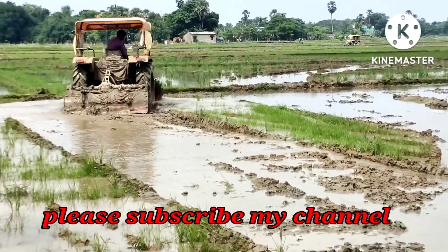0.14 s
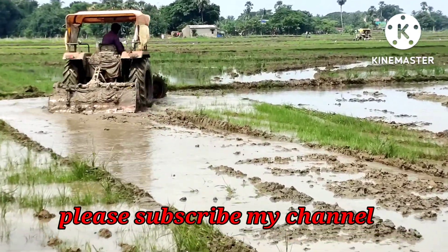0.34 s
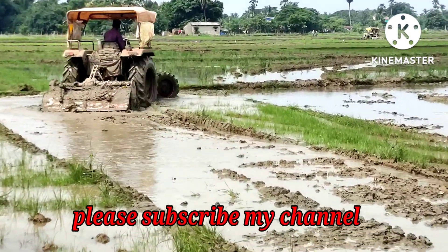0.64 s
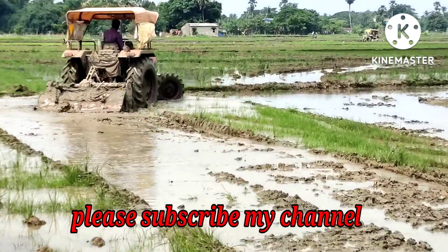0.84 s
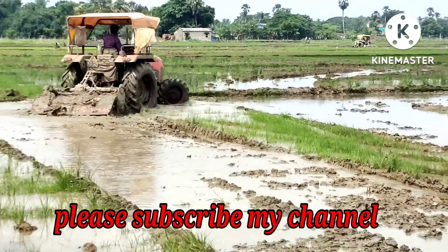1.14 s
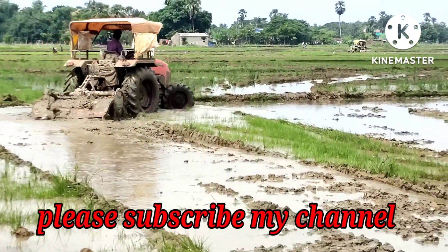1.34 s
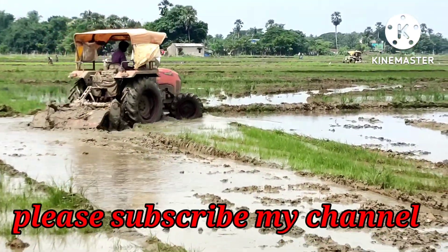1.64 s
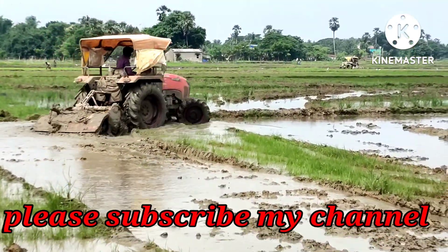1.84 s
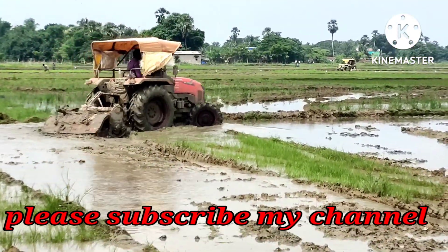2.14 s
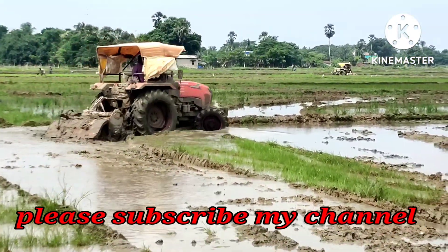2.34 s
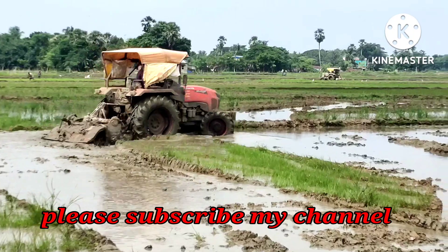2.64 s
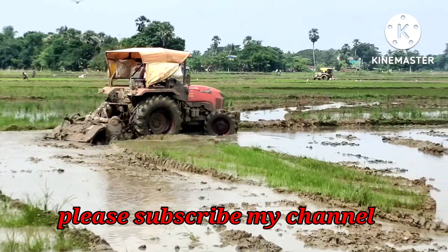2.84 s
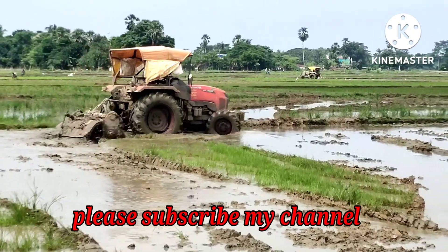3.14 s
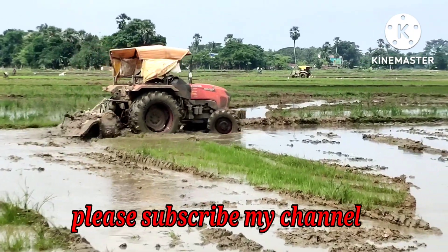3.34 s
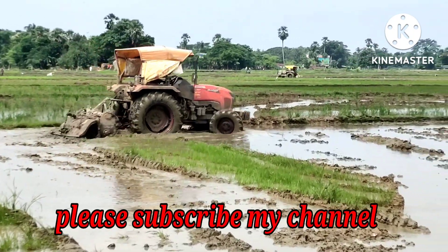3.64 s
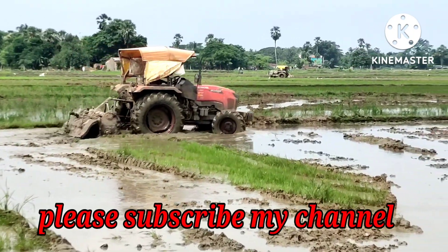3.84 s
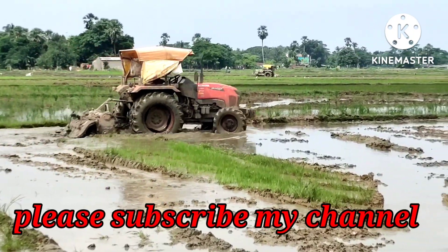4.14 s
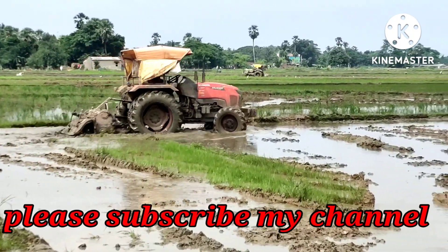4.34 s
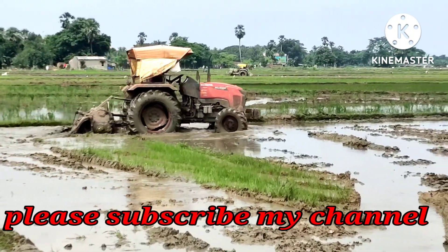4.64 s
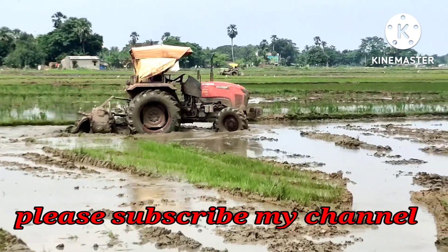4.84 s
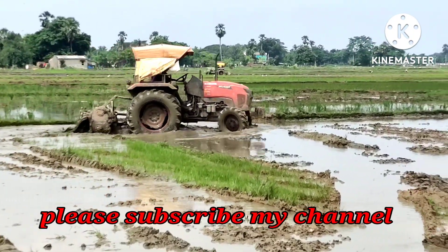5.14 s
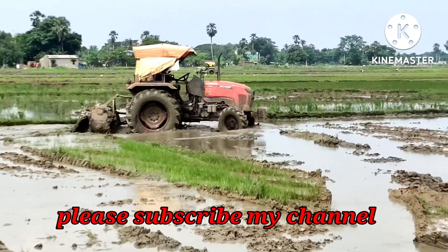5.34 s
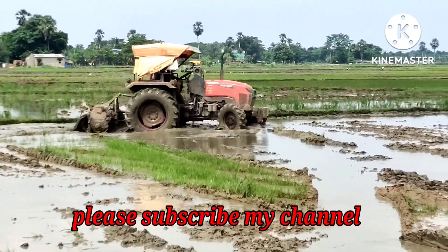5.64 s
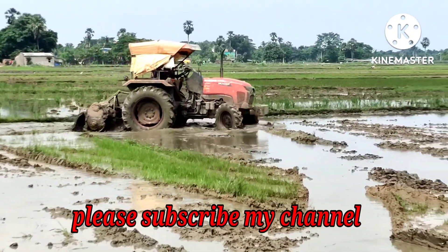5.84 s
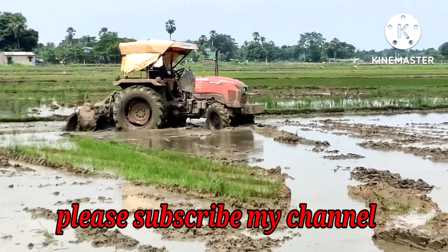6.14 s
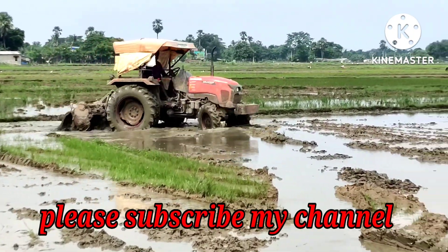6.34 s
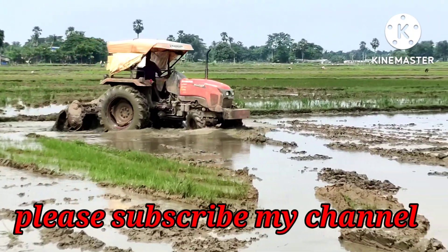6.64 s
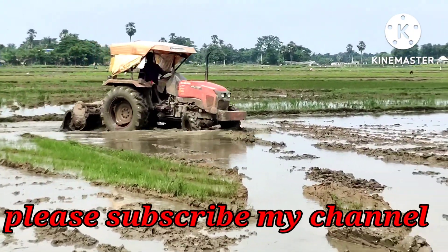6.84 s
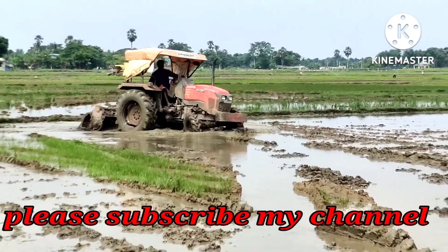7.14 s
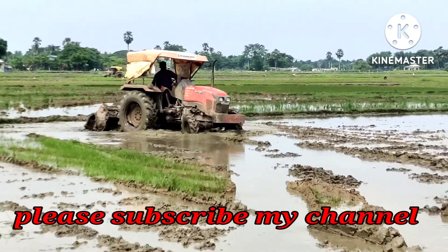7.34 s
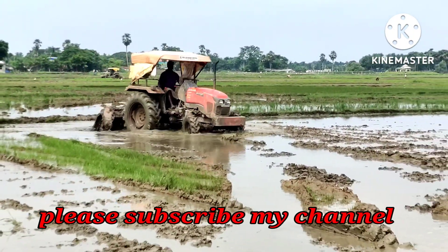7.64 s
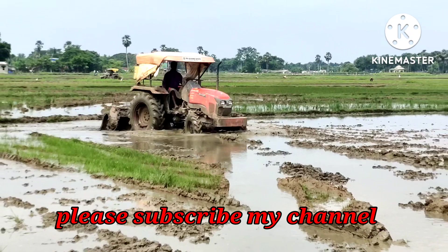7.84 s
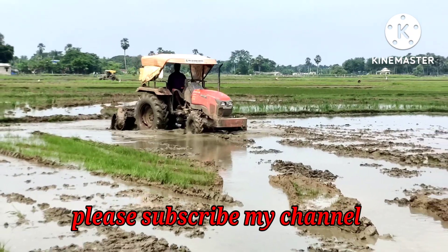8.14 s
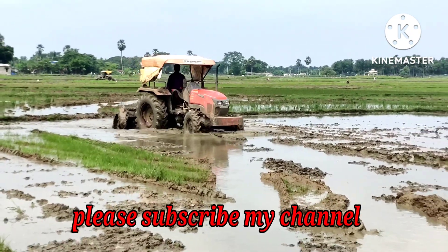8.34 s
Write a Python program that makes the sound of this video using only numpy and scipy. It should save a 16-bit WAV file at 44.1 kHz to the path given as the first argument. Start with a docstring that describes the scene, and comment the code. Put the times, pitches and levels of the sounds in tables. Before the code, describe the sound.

A diesel tractor works a flooded open field, with no echo. Its low exhaust drone, near 60 Hz, runs throughout, sagging around 2 and 3 seconds, under a pulsing metallic sizzle near 4.6 kHz. A loose panel rattles at the start; steel clinks cluster at 1-1.8 seconds as strain makes the sizzle crackle until about 3. The tiller throws wet, gurgling surges, with a heavy mud thump at 2.9. From 3.6 the churning turns narrower and hollow, around 700 Hz, in repeated bursts. Dry joints chirp at 4.5 and 5-5.7. Clods thump strongly from 5.1 to 7, with fine mist around 4 and 5.7-6.9 and a sharp spurt at 6.8. Water washes back at 6.2-6.9, 7.1 and 7.5-8, as the panel rattles and lower clinks ring. A last thump falls at 8.3 while the engine rises slightly, over faint hiss and hum.

```python
"""A flooded field, where a diesel tractor turns, dragging a rotary tiller through water and mud.
Engine: phase-locked exhaust harmonics drone and sag; filtered noise sizzles and rattles in step with
the crank; steel clinks as short rings and dry joints squeak as arching tones.
Tiller and water: resonant noise and bubble packets churn, and mud thumps under the hood. Water splashes
as shaped noise and bubbles, spray tinkles among thin, fitful high tones, and a faint hum lies behind."""
import sys
import numpy as np
from scipy import signal
from scipy.fft import rfft, irfft, next_fast_len
from scipy.io import wavfile
from scipy.ndimage import uniform_filter1d, map_coordinates

SR = 44100
rng = np.random.default_rng(int(sys.argv[2]) if len(sys.argv) > 2 else 0)


def generate_wav(sig):
    """Save sig (samples, or channels by samples) to the path in sys.argv[1] as 16-bit PCM at SR."""
    pcm = np.round(np.clip(np.atleast_2d(sig).T, -1, 1) * 32767).astype(np.int16)
    wavfile.write(sys.argv[1], SR, pcm)


N = 375291

# Engine speed as the exhaust tone, twice the crank rate: time_s, tone_hz
EXHAUST_TONE = [(0, 62.3), (.45, 62.4), (1.0, 61), (1.25, 59.8), (1.6, 60.1), (1.98, 55.1), (2.3, 59.8),
                (2.5, 61.2), (2.8, 60), (3.12, 56.2), (3.55, 61.1), (3.8, 60.3), (4.2, 62), (4.55, 59.3),
                (4.85, 61.2), (6.3, 61.7), (7.25, 62.9), (7.55, 60.3), (8.45, 64.3)]
# Level of the exhaust harmonics as a group: time_s, level_db
EXHAUST_LEVEL = [(0.0, -58), (3.63, -56), (5.81, -61), (8.13, -57), (8.51, -60.5)]
# Exhaust harmonics: multiple_of_exhaust_tone, relative_level_db
EXHAUST_ORDERS = [(1, -6), (2, 1), (3, -11), (4, -9), (5, -14.5), (6, -18.5)]
# Spectrum of the exhaust roar: frequency_hz, relative_density_db_per_hz
ROAR_SPECTRUM = [(15, -34), (42, -0.5), (90, -2), (150, 1), (230, 4.5), (430, -4.5), (700, -18.5),
                 (1200, -3.5), (1450, -16.5), (3200, -17), (3700, -24), (6000, -52)]

# Base level of the engine's sizzle, before its flutter: time_s, level_db
SIZZLE_LEVEL = [(0, -56.5), (2.1, -56), (3.55, -51.5), (4.6, -54.5), (7.55, -54), (8.5, -56.5)]
# Spectrum of the sizzle before its shift: frequency_hz, relative_density_db_per_hz
SIZZLE_SPECTRUM = [(3900, -16), (4250, -17), (4420, 5.5), (4600, 14.5), (4830, 8.5), (4980, 7), (5120, -31),
                   (5500, -35)]
# Slow shift of the sizzle in frequency, before its waver: time_s, shift_hz
SIZZLE_SHIFT = [(0, 10.5), (1.8, 90), (2.3, -29.5), (2.9, 68.5), (4.3, -39), (8.5, -64)]
# The blades bite and the engine strains, adding sizzle: start_s, length_s, level_db
STRAINS = [(1.004, 0.33, -52), (1.559, 0.023, -49.5), (1.684, 0.17, -50.5), (2.363, 0.21, -54.5),
           (2.68, 0.23, -48.5), (2.943, 0.1, -48)]
STRAIN_ATTACK_S, STRAIN_RELEASE_DB_PER_S = 0.016, 79
# Weaker, fitful rings of the sizzling metal: pitch_hz, level_re_sizzle_db, change_at_full_strain_db
SIDE_RINGS = [(3660, -28, 1.5), (4317, -22.5, 7.5), (5205, -21, -1.5), (5674, -21.5, -12)]

# Bouts of a loose panel's rattle: start_s, length_s, level_db, pitch_hz, release_db_per_s
RATTLES = [(0, 0.07, -50, 2804, 40), (0.387, 0.048, -56, 2800, 75), (0.633, 0.017, -57.5, 2780, 122),
           (1.108, 0.2, -61, 2774, 122), (1.643, 0.17, -62.5, 2780, 73), (2.308, 0.038, -56, 2696, 152),
           (2.936, 0.12, -53, 2740, 194), (6.33, 0.25, -56, 2730, 152.5), (6.692, 0.043, -51, 2760, 95),
           (6.935, 0.13, -53, 2690, 159), (7.565, 0.19, -48, 3006, 7), (7.83, 0.22, -53, 2920, 62),
           (8.23, 0.058, -56, 2710, 134)]
RATTLE_ATTACK_S, RATTLE_REST_DB = 0.0089, -75.5
CLATTER_SHARE, CLATTER_WIDTH_HZ = 0.72, 1000  # power share of clatter, before the boom share's weight
# Short contacts of loose steel parts: start_s, peak_db, pitch_hz
CLINKS = [(0.5258, -41.5, 4680), (1.0463, -34, 4830), (1.1125, -39.5, 4700), (1.1786, -38, 4700),
          (1.2524, -38, 4640), (1.264, -37, 4720), (1.353, -44, 4770), (1.5847, -37, 4770),
          (1.795, -38, 4700), (2.7082, -34, 4800), (2.863, -39, 4810), (6.6921, -38, 2745),
          (7.6236, -39, 2680), (7.7704, -38.5, 3040), (7.8505, -34, 2860), (7.884, -34.5, 2840),
          (8.044, -39.5, 2850)]

# Dry joints squeak: start_s, length_s, level_db, top_of_arch_hz (before waver)
SQUEAKS = [(1.992, 0.055, -67, 3260), (2.066, 0.037, -62.5, 2450), (4.522, .055, -51, 3100),
           (4.592, 0.041, -49, 3090), (4.87, 0.15, -63.5, 3050), (4.935, .022, -58, 2530),
           (5.032, .035, -50.5, 3560), (5.088, 0.036, -45, 3035), (5.513, 0.12, -63.5, 3520),
           (5.623, 0.04, -52, 3080), (5.643, 0.038, -54, 2500)]
SQUEAK_ATTACK_S, SQUEAK_RELEASE_DB_PER_S, SQUEAK_RING_DB = 0.0047, 156, -3.5  # after-ring re slip
SQUEAK_FALL_HZ, SQUEAK_WAVER_HZ = 86, 54.9
SQUEAK_CREST = 0.62  # place of the arch's top: 0 start, 2 end

# Share of narrow boom against loose gurgle in the churning: time_s, share_0_to_1
BOOM_SHARE = [(0, 0.74), (1, 0.08), (3.1, 0.25), (3.7, 0.86), (5.2, 0.95), (8.5, 0.94)]
# Churning between surges, before its flutter: time_s, level_db
CHURN_LEVEL = [(0, -67.5), (3.4, -60), (4.2, -54), (5.5, -59), (6.4, -50), (7.6, -50), (8.0, -61),
               (8.5, -59.5)]
# The blades throw up a load of mud: start_s, length_s, mid_level_db, cavity_pitch_hz
SURGES = [(0, 0.22, -57, 650), (0.403, 0.13, -52.5, 626), (0.953, 0.12, -56.5, 751), (1.622, 0.3, -54, 697),
          (2.461, 0.077, -52, 740), (2.68, 0.16, -48, 716), (2.87, 0.19, -49, 659),
          (3.584, 0.12, -46.5, 722), (3.78, 0.029, -45.5, 735), (4.103, 0.057, -45, 747),
          (4.361, 0.16, -46.5, 754), (4.722, 0.24, -51, 721), (5.093, 0.15, -45.5, 720),
          (5.278, 0.23, -48.5, 711), (5.698, 0.1, -45, 719), (6.06, 0.088, -45.5, 677),
          (6.306, 0.15, -51.5, 715), (6.702, 0.062, -44, 727), (6.894, 0.075, -53, 700),
          (7.393, 0.16, -47, 703), (8.275, 0.089, -49.5, 686)]
SURGE_ATTACK_S, SURGE_SAG_DB_PER_S, SURGE_RELEASE_DB_PER_S = 0.016, 6, 254
# Clods of mud thump under the hood: start_s, peak_db, pitch_hz
CLODS = [(0.691, -40.5, 517), (0.817, -45, 900), (.985, -59, 790), (1.275, -50.5, 875), (1.634, -40.5, 688),
         (1.815, -43, 830), (2.112, -49.5, 510), (2.189, -51, 347), (2.685, -41.5, 920), (2.89, -33.5, 636),
         (2.931, -39, 590), (2.982, -46, 610), (3.223, -47, 505), (3.632, -42.5, 680), (3.954, -45, 854),
         (4.102, -46, 800), (4.261, -44, 830), (4.348, -50, 420), (5.107, -36.5, 705), (5.304, -34.5, 747),
         (5.732, -35.5, 730), (5.764, -39, 700), (5.788, -38, 796), (5.941, -40, 687), (6.128, -38, 686),
         (6.33, -49, 430), (6.693, -41, 736), (6.785, -35, 702), (6.924, -32, 706), (7.472, -36.5, 754),
         (8.263, -35, 664)]
KNOCK_HZ, KNOCK_DB = 391.5, -60  # small lumps: centre pitch, and peak before their random size

# The wheels throw up a wash of water: start_s, length_s, level_db
WASHES = [(6.162, 0.74, -57.5), (7.09, 0.36, -57.5), (7.505, 0.45, -54), (8.45, 0.093, -61)]
WASH_ATTACK_S, WASH_RELEASE_DB_PER_S = 0.052, 78
# Water falling back between washes: time_s, level_db
DRIP_LEVEL = [(0, -79), (2.7, -73.5), (4.3, -67.5), (8.5, -65)]
# Spectrum of the falling water: frequency_hz, relative_density_db_per_hz
WATER_SPECTRUM = [(850, -37), (1100, -0.5), (1250, -1.5), (1400, -4.5), (1570, 9), (1750, 9), (2000, -18),
                  (2400, 6.5), (2700, -2), (3100, 5), (3300, -36), (3600, -19), (4000, -25.5)]
# Spectrum of the soft hiss with the water: frequency_hz, relative_density_db_per_hz
AIR_SPECTRUM = [(500, -29), (3000, -6), (6200, -3), (8000, -3.5), (10000, 1), (12000, -1.5), (15500, -1.5)]
# Single splashes, spits and gulps: start_s, bubble_peak_db, centre_pitch_hz, cluster_length_s
SLAPS = [(.02, -65, 12800, .04), (.24, -62, 12600, 0.027), (.68, -51, 471, 0.037), (1.84, -49.5, 520, 0.12),
         (1.89, -55, 1256, .038), (2.07, -52.5, 1110, 0.027), (2.7, -49.5, 930, 0.13),
         (2.8, -57.5, 1574, 0.072), (2.86, -44.5, 555, 0.056), (2.98, -49, 935, .05),
         (3.85, -57, 493, 0.025), (4.12, -55.5, 384, 0.05), (4.71, -55.5, 345, 0.041),
         (4.785, -52.5, 1655, 0.0289), (5.49, -53, 1246, 0.032), (6.08, -53, 363, 0.052),
         (7.16, -49.5, 1745, 0.12), (7.38, -51.5, 1280, 0.11), (7.99, -53, 361, 0.031)]

# Base level of the tinkling drops and high tones: time_s, level_db
SPRAY_LEVEL = [(0, -99), (3.2, -75.5), (3.7, -74), (4.9, -75), (5.9, -67.5), (8.5, -73)]
# Thin, fitful high tones at fixed pitches: pitch_hz, relative_level_db
HIGH_TONES = [(6740, -8), (7580, -0.5), (8440, 5), (10130, -9), (10910, -6), (11325, 2.5), (12680, -7),
              (13040, 14), (14110, -7), (14870, -6)]
HIGH_TONE_WIDTH_HZ, TINKLE_TOP_HZ = 116, 12000  # the tinkle holds only the tones below its top
STRAY_DB = -3.5  # drops at stray pitches, re the high tones
# Narrow, rough high tones held for a moment: start_s, length_s, level_db, pitch_hz
HELD_TONES = [(2.96, 0.079, -55.5, 5320), (5.795, 0.21, -66, 8480), (6.55, 0.3, -66, 5130),
              (7.48, 0.56, -70, 5160), (7.507, 0.47, -66, 5750)]
HELD_ATTACK_S, HELD_RELEASE_DB_PER_S, HELD_WIDTH_HZ = 0.018, 152, 220
# Sheets of fine mist fly up, before flutter: start_s, length_s, level_db
MISTS = [(3.888, 0.26, -66.5), (4.477, 1, -72), (5.713, 0.46, -63), (6.412, 0.47, -67.5)]
MIST_ATTACK_S, MIST_RELEASE_DB_PER_S = 0.26, 42
# Sudden spurts of spray: start_s, length_s, level_db
SPURTS = [(5.55, 0.014, -60.5), (6.762, 0.01, -50.5)]
SPURT_ATTACK_S, SPURT_RELEASE_DB_PER_S = 0.0042, 420
# Spectrum of the spurts: frequency_hz, relative_density_db_per_hz
SPURT_SPECTRUM = [(5400, -4), (15500, 5)]

# Faint background hum: time_s, peak_db
HUM_LEVEL = [(0, -73), (8.5, -62.5)]
HUM_HZ = 143.0
TOP_HZ = 15520  # band limit of the whole sound


def exhaust(cycles):
    """Harmonic series with dispersion: silencer-spread low engine orders over a roar that puffs with them."""
    lines = sum(amp(db) * np.cos(2 * np.pi * k * cycles + 0.895 * k * k) for k, db in EXHAUST_ORDERS)
    puffs = rng.standard_normal(N) * beats(cycles, depth_db=2.0)
    roar = coloured(puffs, ROAR_SPECTRUM)
    return amp(curve(EXHAUST_LEVEL)) * lines + amp(-60.5) * roar


def sizzle(cycles):
    """Amplitude modulation: a metallic hiss pulses three times a crank turn and crackles under strain."""
    strain = swells(*np.transpose(STRAINS), STRAIN_ATTACK_S, STRAIN_RELEASE_DB_PER_S)
    level = np.hypot(amp(curve(SIZZLE_LEVEL)), strain)
    effort = (strain / level) ** 2  # strain's share of the power

    drive = rng.standard_normal(N) * beats(1.5 * cycles, depth_db=2.4)
    drive = drive * amp((1.0 + 1.7 * effort) * wobble(260))
    # single-sideband shift moves the whole hiss in frequency
    shift_hz = curve(SIZZLE_SHIFT) + 35 * wobble(18)
    glide = np.exp(2j * np.pi * np.cumsum(shift_hz) / SR)
    analytic = signal.hilbert(coloured(drive, SIZZLE_SPECTRUM), next_fast_len(N))[:N]
    calm = steadied((analytic * glide).real, span=0.4)

    ticks = impacts(rate=620, spread_db=2.0)
    crackle = steadied(tracked(ticks, 4700 + 150 * effort, width_hz=400, steep=8.2), span=0.079)

    rings = np.zeros(N)
    for hz, db, flare_db in SIDE_RINGS:
        flicker = fitful(rate=7, depth_db=5) * patter(depth_db=6)
        ring = tracked(flicker, np.full(N, hz), width_hz=300, steep=6.2)
        rings += amp(db + flare_db * effort) * ring

    share = np.clip(0.63 * effort, 0, 1)
    mixed = np.sqrt(1 - share) * calm + np.sqrt(share) * crackle + rings
    return level * amp(1.73 * wobble(16)) * mixed


def rattle(cycles):
    """Forced resonance: a panel knocked twice a crank turn rings, and clatters more as the boom share grows."""
    s, length, db, hz, release = np.transpose(RATTLES)
    bouts = swells(s, length, db, RATTLE_ATTACK_S, release)
    level = np.hypot(bouts, amp(RATTLE_REST_DB))
    knocks = amp(-9 * (cycles % 1) + 1.5 * wobble(40))  # each knock decays until the next
    pitch = pitch_through(s, length, hz)
    ring = tracked(rng.standard_normal(N) * knocks, pitch, width_hz=230, steep=4.8)
    clatter = tracked(patter(depth_db=8) * knocks, pitch - 40, CLATTER_WIDTH_HZ, steep=12.5)
    share = np.clip(CLATTER_SHARE * curve(BOOM_SHARE) ** 4, 0, 1)
    return level * steadied(np.sqrt(1 - share) * ring + np.sqrt(share) * clatter, span=0.091)


def clinks():
    """Impulse response: short, hard contacts of steel ring and die at once."""
    return packets(*np.transpose(CLINKS), rise=0.0026)


def squeaks():
    """Frictional slip: a dry joint's nearly pure tone arches up and falls, then the part rings on roughly."""
    t, out = np.arange(N) / SR, np.zeros(N)
    waver = wobble(90)
    grain = wobble(220) + 1j * wobble(220)
    for s, length, db, hz in SQUEAKS:
        at = np.flatnonzero((t >= s) & (t < s + .5))
        age = t[at] - s
        arch = (2 * np.minimum(age / length, 1) - SQUEAK_CREST) ** 2
        pitch = hz + SQUEAK_WAVER_HZ * waver[at] - SQUEAK_FALL_HZ * arch
        hold = np.clip((length - age) / SQUEAK_ATTACK_S + .5, 0, 1)
        slip = hold * np.exp(2j * np.pi * np.cumsum(pitch) / SR)
        decay = amp(SQUEAK_RING_DB - SQUEAK_RELEASE_DB_PER_S * np.maximum(age - length, 0))
        after = decay * grain[at] * np.exp(2j * np.pi * (hz - SQUEAK_WAVER_HZ) * age)
        rise = np.minimum(age / SQUEAK_ATTACK_S, 1)
        out[at] += amp(db) * rise * (np.sqrt(2) * slip + after).real
    return out


def tiller():
    """Cavity resonance: mud flung under the hood gurgles loosely and booms narrowly, in changing shares."""
    s, length, db, hz = np.transpose(SURGES)
    surges = swells(s, length, db, SURGE_ATTACK_S, SURGE_RELEASE_DB_PER_S, SURGE_SAG_DB_PER_S)
    level = np.hypot(surges, amp(curve(CHURN_LEVEL) + 1.8 * wobble(8.5)))
    centre = pitch_through(s, length, hz)
    gurgle = bubbles(centre + 25, scatter=0.19, rise=0.0059, spread_db=3.0, count=1300)
    gurgle = steadied(gurgle, span=0.099)
    blows = impacts(rate=300, spread_db=0.0)
    boom = steadied(tracked(blows, centre + 28 * wobble(14), width_hz=164, steep=4.2), span=0.04)
    share = np.clip(curve(BOOM_SHARE), 0, 1)
    return level * (np.sqrt(1 - share) * gurgle + np.sqrt(share) * boom)


def clods():
    """Damped impact: heavy lumps strike the hood with a short boom; small ones knock lower, at random."""
    knocks = bubbles(np.full(N, KNOCK_HZ), scatter=.3, rise=0.0066, spread_db=5.5, count=50)
    return packets(*np.transpose(CLODS), rise=0.0061) + amp(KNOCK_DB) * knocks


def splashing():
    """Superposition of bubbles: thrown water patters back in washes, drips and splashes, over a soft hiss."""
    washes = swells(*np.transpose(WASHES), WASH_ATTACK_S, WASH_RELEASE_DB_PER_S)
    plinks = bubbles(np.full(N, 1850), scatter=.62, rise=0.0079, spread_db=6.0, count=2600)
    falling = unit(plinks) + unit(patter(depth_db=1))
    drops = steadied(coloured(falling, WATER_SPECTRUM), span=0.26)
    level = np.hypot(washes, amp(curve(DRIP_LEVEL)))
    hiss = amp(-71.0) * coloured(rng.standard_normal(N), AIR_SPECTRUM)
    return level * drops + slaps() + hiss


def slaps(count=10):
    """Bubble resonance: each splash is a quick cluster of bubbles of nearly one size."""
    s, db, hz, length = np.repeat(SLAPS, count, axis=0).T
    when = (np.arange(len(s)) % count + rng.random(len(s))) / count  # place in the cluster, 0 to 1
    scatter_hz = 14 + 0.0064 * np.minimum(hz, 6000)
    pitch = hz + scatter_hz * rng.standard_normal(len(s))
    return packets(s + length * when - .005, db, pitch, rise=0.0068)  # start early: rings swell slowly


def spray():
    """Resonant filtering of impulses: fitful high tones mix with drops as tinkle and as sheets of mist."""
    tones = []
    for hz, db in HIGH_TONES:
        tone = tracked(impacts(rate=180, spread_db=4.5), np.full(N, hz), HIGH_TONE_WIDTH_HZ, steep=2.1)
        tones.append(amp(db) * fitful(rate=17, depth_db=9) * tone)
    tones = np.array(tones)
    lower = np.transpose(HIGH_TONES)[0] < TINKLE_TOP_HZ

    def drops(hz, scatter, count):
        """Random superposition: drops scattered in pitch, at rms 1."""
        return unit(bubbles(np.full(N, hz), scatter, rise=0.0071, spread_db=5.5, count=count))

    tinkle = unit(tones[lower].sum(axis=0)) + amp(STRAY_DB) * drops(7800, scatter=.3, count=600)
    mist = unit(tones.sum(axis=0))
    mist = mist + amp(-3.5) * drops(7300, scatter=0.26, count=2200)
    mist = mist + drops(12700, scatter=.2, count=1800)
    sheets = swells(*np.transpose(MISTS), MIST_ATTACK_S, MIST_RELEASE_DB_PER_S)
    sheets = sheets * amp(2.7 * wobble(30)) * steadied(mist, span=0.28)
    spurts = swells(*np.transpose(SPURTS), SPURT_ATTACK_S, SPURT_RELEASE_DB_PER_S)
    spurts = spurts * coloured(patter(depth_db=15), SPURT_SPECTRUM)
    return amp(curve(SPRAY_LEVEL)) * unit(tinkle) + sheets + spurts


def held_tones():
    """Narrow-band noise: rough high tones, each held for a moment at one pitch."""
    out = np.zeros(N)
    for s, length, db, hz in HELD_TONES:
        tone = tracked(rng.standard_normal(N), np.full(N, hz), HELD_WIDTH_HZ, steep=5.4)
        out += swells(s, length, np.array([db]), HELD_ATTACK_S, HELD_RELEASE_DB_PER_S) * tone
    return out


def far_hum():
    """Independent oscillation: a faint, phase-wavering hum keeps its pitch when the tractor sags."""
    phase = 2 * np.pi * HUM_HZ * np.arange(N) / SR + 1.1 * wobble(3.0)
    return amp(curve(HUM_LEVEL)) * np.sin(phase)


def amp(db):
    """Logarithmic level: decibels to gain."""
    return 10 ** (np.asarray(db) / 20)


def unit(x):
    """Power normalisation: scale to rms 1."""
    return x / np.sqrt(np.mean(x ** 2) + 1e-20)


def curve(rows):
    """Linear interpolation: (time_s, value) rows to one value per sample."""
    return np.interp(np.arange(N) / SR, *np.transpose(rows))


def wobble(rate):
    """Band-limited randomness: a smooth random curve, rate knots a second."""
    knots = rng.standard_normal(int(N * rate / SR) + 4)
    return map_coordinates(knots, [np.arange(N) * rate / SR])


def filtered(x, response):
    """Linear filtering: the spectrum of x times a response of frequency."""
    m = next_fast_len(N + 8192)  # padding keeps the tail from wrapping round
    return irfft(rfft(x, m) * response(np.fft.rfftfreq(m, 1 / SR)), m)[:N]


def coloured(x, spectrum):
    """Spectral shaping: x through a (frequency_hz, db) curve closed at both ends, at rms 1."""
    f, db = np.transpose(spectrum)
    return unit(filtered(x, lambda hz: amp(np.interp(np.log(hz + 1), np.log(f), db, -120, -120))))


def tracked(x, centre_hz, width_hz, steep):
    """Heterodyne filtering: x through a resonance whose centre may move, at rms 1."""
    carrier = np.exp(2j * np.pi * np.cumsum(centre_hz) / SR)
    base = x / carrier
    skirt = lambda hz: (1 + (2 * hz / width_hz) ** 2) ** (-steep / 2)
    return unit((carrier * (filtered(base.real, skirt) + 1j * filtered(base.imag, skirt))).real)


def steadied(x, span):
    """Power levelling: x near rms 1 over every span of seconds; faster grain stays."""
    size = max(int(span * SR), 1)
    power = np.abs(uniform_filter1d(uniform_filter1d(unit(x) ** 2, size), size))
    return x / np.sqrt(np.mean(x ** 2) * (power + .05))  # the floor limits gain in gaps


def beats(cycles, depth_db):
    """Periodic modulation: a gain that peaks once in every cycle."""
    return amp(depth_db * np.cos(2 * np.pi * cycles))


def fitful(rate, depth_db):
    """Random modulation: a gain of rms 1 that comes and goes."""
    return unit(amp(depth_db * np.tanh(wobble(rate))))


def swells(s, length, db, attack_s, release, sag=0):
    """Envelopes, power-summed: events rise, hold while sagging, then die away (sag, release in dB/s)."""
    t = np.arange(0, N, 64)[:, None] / SR
    age = t - s
    rise = np.clip(age / attack_s + .5, 0, 1)
    fall_db = sag * (np.clip(age, 0, length) - length / 2) + release * np.maximum(age - length, 0)
    return np.interp(np.arange(N) / SR, t[:, 0], np.linalg.norm(rise * amp(db - fall_db), axis=1))


def pitch_through(s, length, hz):
    """Pitch glide: drift from the middle of one event to the middle of the next."""
    return curve(np.transpose([s + length / 2, hz]))


def impacts(rate, spread_db):
    """Poisson-like process: random impulses of uneven size and sign, rate a second."""
    hits = rng.random(N) < rate / SR
    return hits * rng.choice([-1, 1], N) * amp(spread_db * rng.standard_normal(N))


def packets(s, db, hz, rise):
    """Damped oscillation: each ring swells for its rise time, peaks at db and dies away."""
    t = np.arange(int(SR * .04)) / SR
    u = t / np.reshape(rise, (-1, 1))
    envelope = amp(db)[:, None] * (u * np.exp(1 - u)) ** 2
    rings = envelope * np.sin(2 * np.pi * (hz[:, None] * t + rng.random((len(s), 1))))
    at = (s * SR).astype(int)[:, None] + np.arange(len(t))
    return np.bincount(at.ravel(), rings.ravel(), N)[:N]


def bubbles(centre_hz, scatter, rise, spread_db, count):
    """Random superposition: count rings, uneven in size, scattered in pitch round a moving centre."""
    when, size = rng.random(count), rng.standard_normal(count)
    offset = rng.uniform(-1.002, 1, count)
    pitch = centre_hz[(when * N).astype(int)] * np.exp(scatter * offset)
    return packets(when * N / SR, spread_db * np.minimum(size, 1.6), pitch, rise)


def patter(depth_db):
    """Time-frequency modulation: noise flares briefly at random pitches, as countless drops overlap."""
    z = signal.stft(rng.standard_normal(N), nperseg=512)[2]
    patch = np.outer(np.hanning(5), np.hanning(12))  # frequency bins by time frames
    field = signal.fftconvolve(rng.standard_normal(z.shape), patch, "same")
    return signal.istft(z * amp(depth_db * np.minimum(unit(field), 2)), nperseg=512)[1][:N]


def scene():
    """Superposition: one crankshaft times exhaust, sizzle and rattle; the open field gives no echo."""
    cycles = np.cumsum(curve(EXHAUST_TONE)) / SR
    engine = exhaust(cycles) + sizzle(cycles) + rattle(cycles) + clinks() + squeaks()
    water = splashing() + spray() + held_tones()
    return (engine + tiller() + clods() + water + far_hum())[None]


def record(dry):
    """Band limitation: nothing is kept at or above the limit."""
    return filtered(dry[0], lambda hz: hz < TOP_HZ)[None]


dry = scene()
out = record(dry)
generate_wav(out)
```